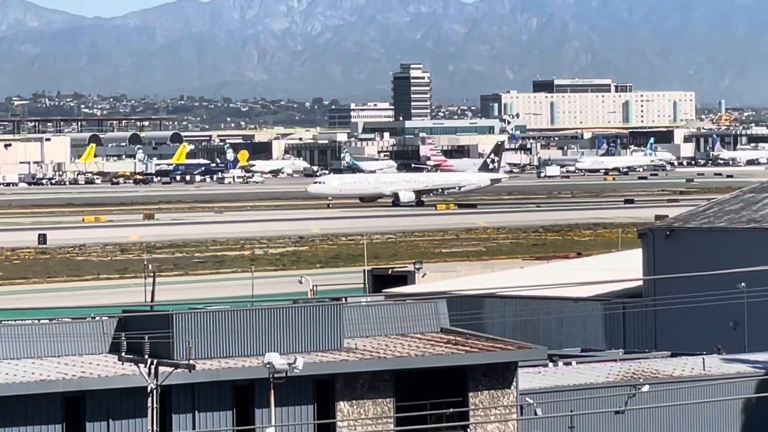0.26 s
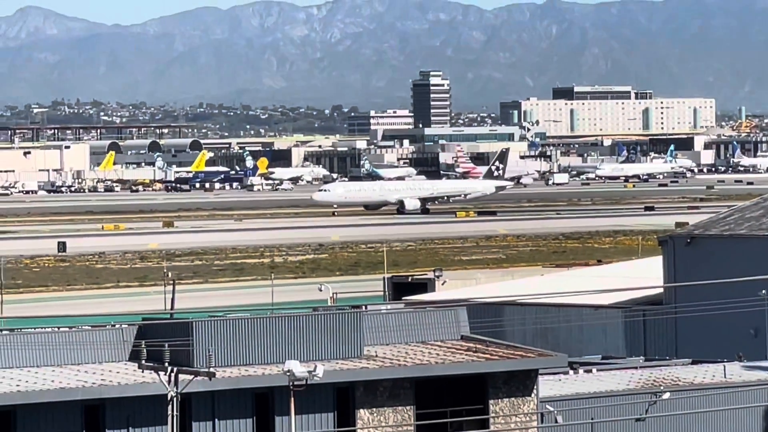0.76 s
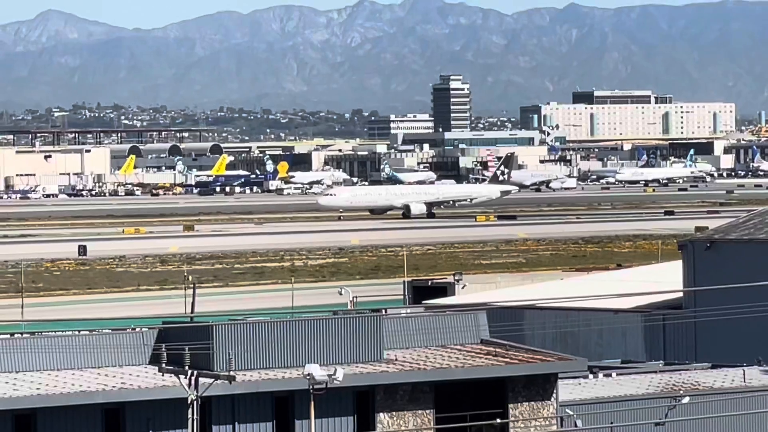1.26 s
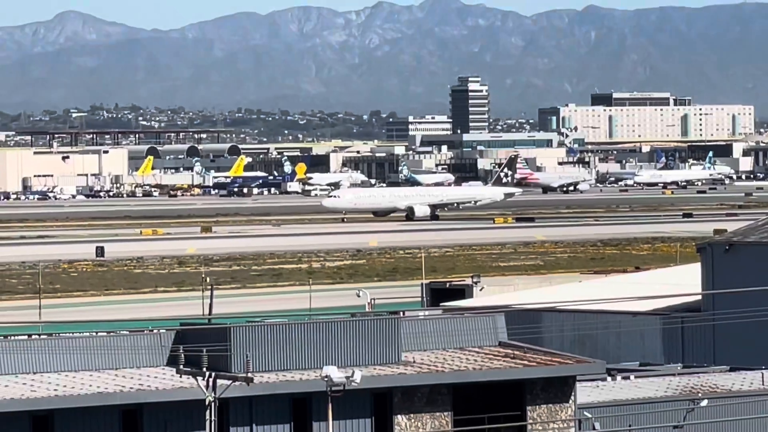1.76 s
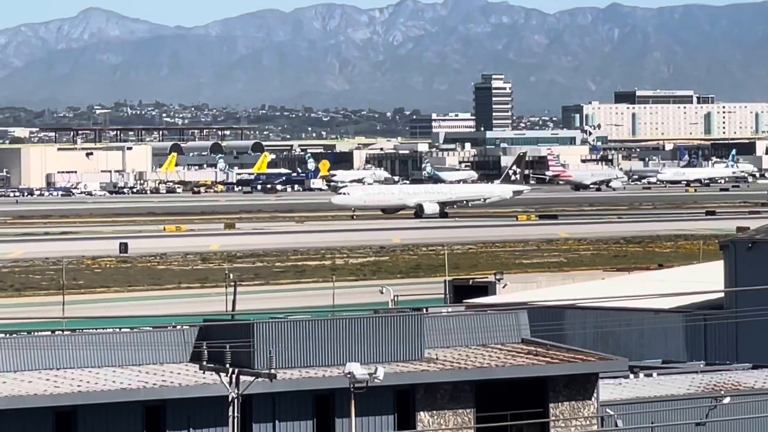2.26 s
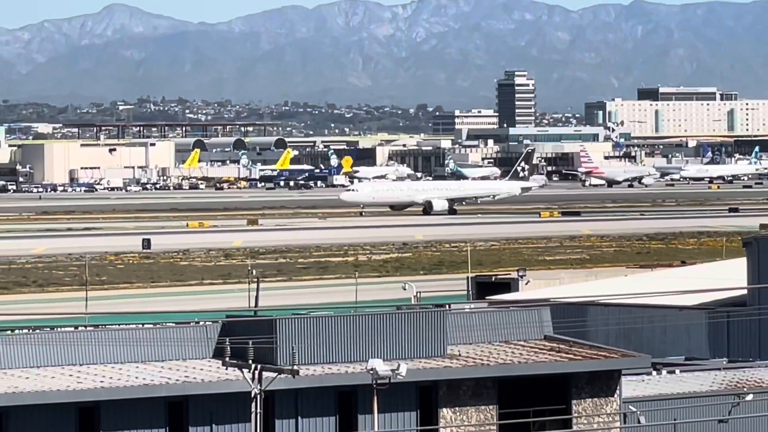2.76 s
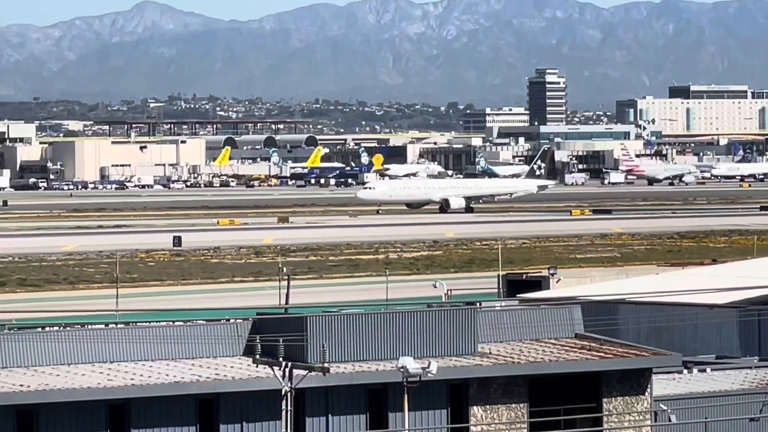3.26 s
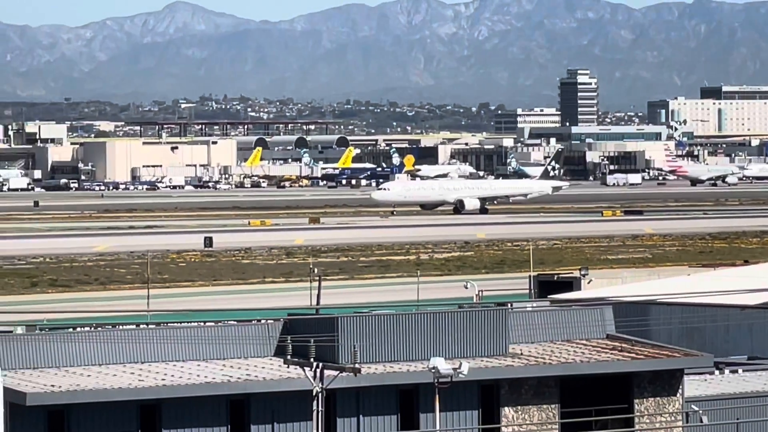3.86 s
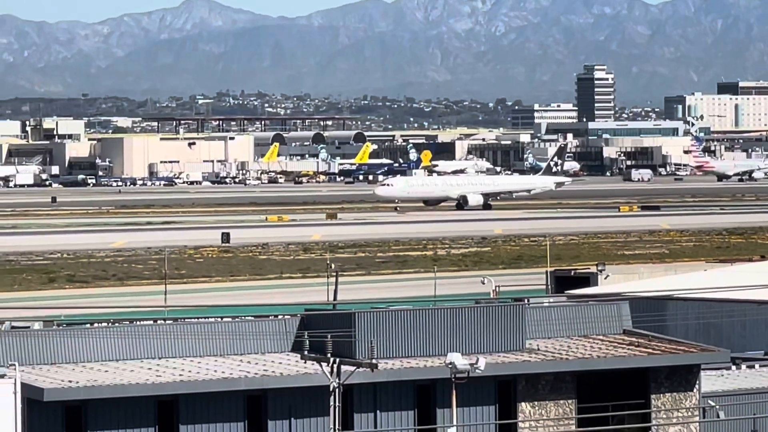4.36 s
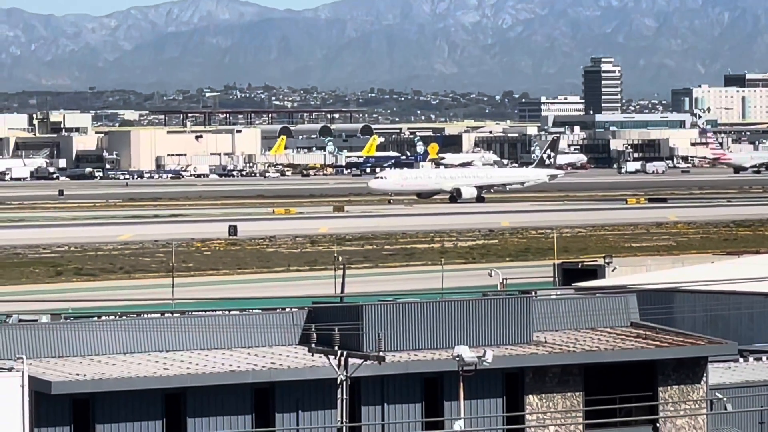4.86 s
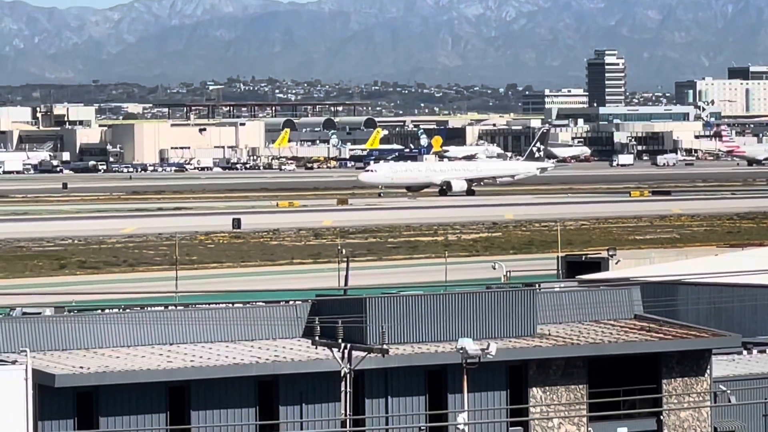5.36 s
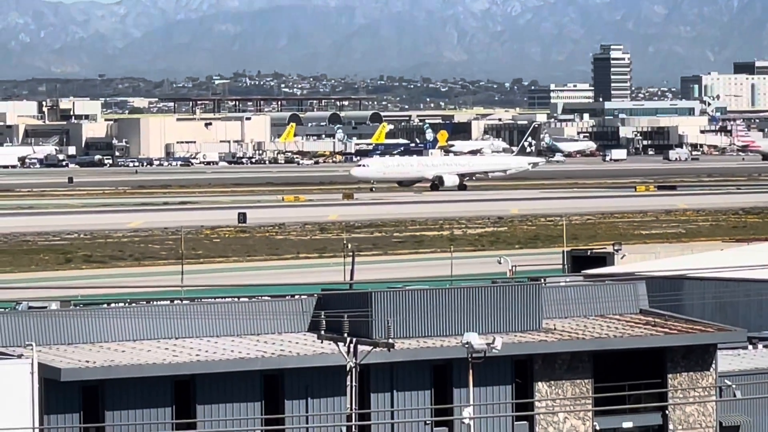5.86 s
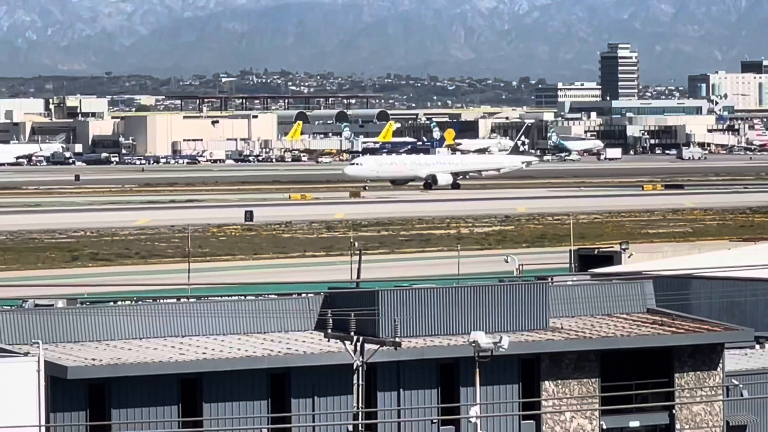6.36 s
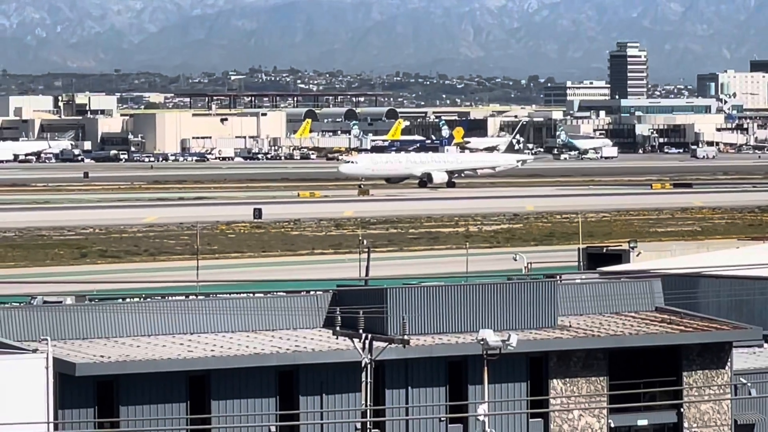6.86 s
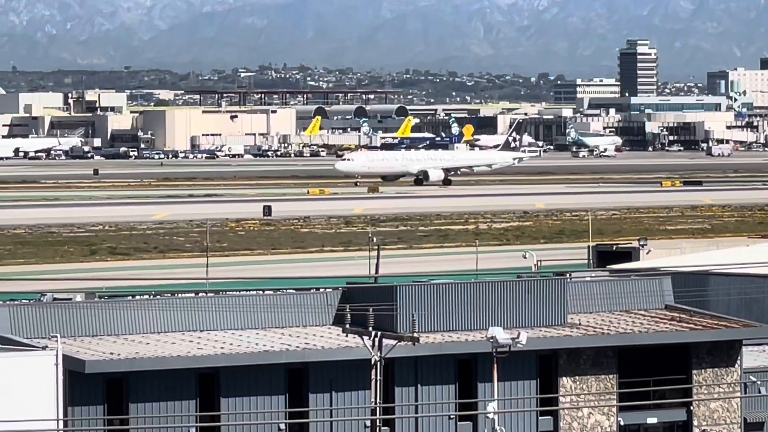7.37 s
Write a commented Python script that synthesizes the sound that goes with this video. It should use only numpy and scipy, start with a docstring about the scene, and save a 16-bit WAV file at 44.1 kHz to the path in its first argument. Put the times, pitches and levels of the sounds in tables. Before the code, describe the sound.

A distant airliner's dull jet roar swells and thins over deep airfield rumble while a nearer engine drone grows louder on the left.

```python
"""A rooftop within earshot of an airfield: on a far runway an airliner rolls down, a dull roar of shaped noise
that swells and thins. A nearer engine drones past on the left, tones on a pitch that sinks overall, with a rush
of noise; wide noise bands make the airfield rumble. Machinery hums in wavering low tones, a light wind puffs,
dull thumps are short bass bursts, and narrow hiss patches and clicks rustle and tick faintly close to the phone."""
import sys
import numpy as np
from scipy import signal
from scipy.fft import rfft, irfft
from scipy.io import wavfile
from scipy.ndimage import uniform_filter1d

SR = 44100
rng = np.random.default_rng(int(sys.argv[2]) if len(sys.argv) > 2 else 0)


def generate_wav(sig):
    """Save sig (samples, or channels by samples) to the path in sys.argv[1] as 16-bit PCM at SR."""
    pcm = np.round(np.clip(np.atleast_2d(sig).T, -1, 1) * 32767).astype(np.int16)
    wavfile.write(sys.argv[1], SR, pcm)


N = 336042  # length [samples]
OCTAVES = np.arange(5, 14.)  # band centres [log2 Hz]
LEFT_RIGHT = np.array([[1], [-1]])  # sign of a left-minus-right offset at each port


def undb(db):
    """Decibels to gain."""
    return 10 ** (np.asarray(db) / 20)


def curves(table):
    """Columns of a table as values per sample."""
    s, *columns = np.transpose(table)
    return [np.interp(np.arange(N) / SR, s, c) for c in columns]


def walk(rate):
    """Random levels held 1 / rate s and slewed twice; spread near 1."""
    hold = int(SR / rate)
    steps = np.repeat(rng.standard_normal(N // hold + 1), hold)
    return 1.3 * uniform_filter1d(uniform_filter1d(steps, hold), hold)[:N]


def bin_hz():
    """Frequencies of the spectrum's bins, one bin up so that none is zero."""
    return np.arange(1, N // 2 + 2) * SR / N


def stereo_noise(colour, likeness, lead, pan_db):
    """Spectra of a coloured noise of rms near 1 at two ports: a shared part and an unrelated part."""
    points, db = np.transpose(colour)
    gain = undb(np.interp(np.log(bin_hz()), np.log(points), db, left=-120, right=-120))
    mid, side = (rfft(rng.standard_normal(N)) for _ in range(2))
    c = np.clip(likeness, 0, 1)
    ports = np.sqrt((1 + c) / 2) * mid + LEFT_RIGHT * np.sqrt((1 - c) / 2) * side
    ports = ports * np.exp(.5j * LEFT_RIGHT * lead)
    return ports * undb(LEFT_RIGHT * pan_db / 2) * gain / np.sqrt(np.mean(gain ** 2))


def turbulent(spectra, band_db, patchy_db, rate, centres):
    """Splits a sound into soft bands (centres in octaves); each has its own level and flickers with the air."""
    octave = np.clip(np.log2(bin_hz()), centres[0], centres[-1])
    spacing = centres[1] - centres[0]
    out = 0
    for centre in centres:
        share = np.cos(np.pi / 2 * np.clip((octave - centre) / spacing, -1, 1)) ** 2
        level_db = band_db(2 ** centre) + patchy_db * walk(rate)
        out = out + irfft(spectra * share, N) * undb(level_db)
    return out


# jet roar as it arrives, swelling with the wind along the path: (time [s], level [dB], hump centre [Hz])
JET = [(0, -34.5, 1180), (.35, -35.5, 1160), (.8, -35, 1060), (1.05, -33, 1030), (1.27, -31, 1015),
       (1.59, -36, 1040), (1.95, -32, 1110), (2.25, -34.5, 1130), (2.5, -35, 1160), (3.18, -35, 1130),
       (3.55, -34, 1180), (3.9, -33, 1170), (4.13, -35, 1110), (4.44, -37, 1160), (4.7, -35, 1120),
       (5.1, -35, 1240), (5.4, -34.5, 1290), (5.75, -37.5, 1160), (6.2, -39.5, 1100), (6.67, -39, 1052),
       (7.1, -41.5, 1003), (7.62, -42.5, 1000)]
# colour after a long path, a ground dip below the hump and air loss above it:
# (frequency [Hz], relative density [dB per Hz])
JET_COLOUR = [(300, -29.5), (600, -9.5), (850, -10.5), (930, -2), (1050, -1), (1250, -2), (1600, -6.5),
              (2000, -13.5), (2500, -19.5), (3000, -31), (3600, -39)]
# eddies on the path shake the whole roar: slow gusts, quick grain
JET_GUST_DB, JET_GRAIN_DB = .45, .6
# swells lift the hump more than the treble: tilt lost [dB per octave] for each dB above the running mean
JET_DULLING, JET_MEAN_S, JET_TILT_DB = 0.72, 3.8, 0.1
# the hump drifts as the path over the ground changes: lift at its centre, width
HUMP_DB, HUMP_OCTAVES = 2, 0.3


def jet():
    """Exhaust turbulence; wind along the long path brightens and dulls it and shifts its hump."""
    db, hump_hz = curves(JET)
    swell_db = db - uniform_filter1d(db, int(JET_MEAN_S * SR))
    tilt_db = JET_TILT_DB - JET_DULLING * swell_db

    def band_db(hz):
        """Tilt around the hump plus the hump itself."""
        octaves_off = np.log2(hz / hump_hz)
        return tilt_db * octaves_off + HUMP_DB * np.exp(-(octaves_off / HUMP_OCTAVES) ** 2)

    gusts_db = JET_GUST_DB * walk(14) + JET_GRAIN_DB * walk(40)
    roar = stereo_noise(JET_COLOUR, likeness=1, lead=0, pan_db=0)
    thirds = np.arange(9, 11.5, 1 / 3)  # third-octave centres
    return undb(db + gusts_db) * turbulent(roar, band_db, patchy_db=1.05, rate=12, centres=thirds)


# firing tone, fading in and out as buildings and echoes come between: (time [s], level [dB])
DRONE = [(1, -45), (1.3, -31.5), (1.5, -27.5), (1.75, -34.5), (2.1, -33.5), (2.4, -42), (3.05, -35),
         (3.3, -41.5), (3.7, -30), (4.15, -30.5), (4.35, -26.5), (4.6, -36), (4.8, -25), (5.1, -31),
         (5.4, -27), (5.8, -26), (6.15, -34), (6.33, -31.5), (6.45, -24), (6.55, -18.5), (6.68, -13.5),
         (6.92, -13.5), (6.99, -16), (7.02, -19), (7.05, -14.5), (7.3, -17.5), (7.48, -18.5), (7.515, -23),
         (7.55, -22), (7.575, -18), (7.62, -17.5)]
# pitch of the passing engine, sinking overall: (time [s], firing rate [Hz], level of upper orders [dB])
DRONE_PITCH = [(1, 93.53, -61), (3.7, 92.8, -52.5), (4.3, 92.1, -46), (5.35, 91.36, -43), (5.8, 90.3, -44),
               (6.3, 89.85, -43.5), (6.65, 86.3, -46.5), (7.0, 87, -40), (7.1, 85.65, -43),
               (7.62, 84.47, -40.5)]
# upper orders, uneven cylinders give the half orders:
# (multiple of the firing rate, far level [dB], near level [dB], left leads [rad])
DRONE_ORDERS = [(1.5, -4.5, -5, .1), (2, -7.5, -9.5, .1), (3, -7, -18, .3), (3.5, -6.5, -9.5, .4),
                (4.5, -8, 0.5, .5), (5, -9.5, -8, .5), (5.5, 1, 1.5, .5), (6, -3.5, 0.5, .5)]
# the drone swings out to the left: (time [s], share of the orders' lead, roughness [1 = far])
DRONE_SWING = [(1, .1, 1), (5.2, .2, 1), (6, .8, 1), (6.3, .9, 1), (6.7, 1, .7), (6.9, 1, .75),
               (6.98, 1, 1.6), (7.06, 1, .7), (7.62, 1.1, .75)]
DRONE_PAN_DB = -1.33  # firing tone only, left minus right


def drone():
    """A fluttering firing tone and broken upper orders, clearer as it nears but for a brief rough spell."""
    hz, upper_db = curves(DRONE_PITCH)
    tone_db, = curves(DRONE)
    swing, rough = curves(DRONE_SWING)
    phase = 2 * np.pi * np.cumsum(hz) / SR
    near = np.clip((1 - rough) / (1 - rough.min()), 0, 1)

    flutter = (1 - near / 2) * rough
    tone_gain = undb(tone_db + 0.64 * flutter * walk(13) + LEFT_RIGHT * DRONE_PAN_DB / 2)
    tone = tone_gain * np.sin(phase + 0.12 * flutter * walk(5.4))

    upper = 0
    for k, far_db, near_db, lead in DRONE_ORDERS:
        broken_db = rough * (3.2 * walk(16) + 1.1 * walk(5))
        order_db = far_db + near * (near_db - far_db) + broken_db
        order_phase = k * (phase + .14 * rough * walk(25))
        upper = upper + undb(order_db) * np.sin(order_phase + LEFT_RIGHT * swing * lead / 2)

    arrival = np.clip((np.arange(N) / SR - DRONE[0][0]) / 0.16, 0, 1)
    return np.sqrt(2) * arrival * (tone + undb(upper_db) * upper)


# broad rush from the left that grows as the engine comes near: (time [s], level [dB])
RUSH = [(0, -48), (1, -43.5), (1.5, -46), (2.2, -52.5), (2.8, -52), (3.4, -49), (4.2, -46), (5.2, -42.5),
        (6.6, -39.5), (7.62, -40.5)]
# colour of the rush: (frequency [Hz], relative density [dB per Hz])
RUSH_COLOUR = [(350, -17), (550, 0.5), (800, 1), (1100, 1.5), (1500, -8.5), (2000, -24), (2700, -32.5)]
RUSH_LIKENESS, RUSH_LEAD_RAD, RUSH_PAN_DB = 0.38, 0.93, 4.5  # left leads and is louder


def rush():
    """A wide noise that follows its own swell."""
    wide = stereo_noise(RUSH_COLOUR, RUSH_LIKENESS, RUSH_LEAD_RAD, RUSH_PAN_DB)
    level = undb(curves(RUSH)[0])
    return level * turbulent(wide, lambda hz: 0, patchy_db=0.2, rate=6.9, centres=OCTAVES[4:7])


# dull low thumps: (time [s], pitch [Hz], peak level [dB])
THUMPS = [(.12, 55, -27), (0.802, 60, -25), (2.79, 55, -26), (3.901, 55, -23), (4.262, 75.4, -22),
          (4.69, 60, -33), (6.97, 60.3, -15.5), (7.429, 62, -27), (7.539, 75.6, -10), (7.61, 65, -21)]
THUMP_S = 0.012  # from the peak to 1/e


def thumps():
    """A cycle or two of deep bass under a soft swell."""
    t = np.arange(N) / SR
    out = np.zeros(N)
    for s, hz, db in THUMPS:
        swell = np.exp(-((t - s) / THUMP_S) ** 2)
        out -= undb(db) * swell * np.cos(2 * np.pi * hz * (t - s))
    return out


# fainter rustles fall at random: middle level, scatter, longest length, lowest pitch, range in octaves
FAINT_DB, FAINT_SCATTER_DB, FAINT_LONGEST_S, FAINT_HZ, FAINT_OCTAVES = -81.5, 3, 0.099, 5100, .48


def faint_rustles(count):
    """Rows like those of the loud rustles, drawn at random."""
    when, length, pitch, size = rng.random((count, 4)).T
    starts = when * (N / SR - FAINT_LONGEST_S)
    lengths = FAINT_LONGEST_S * (1 + 3 * length) / 4
    centres = FAINT_HZ * 2 ** (FAINT_OCTAVES * pitch)
    levels = FAINT_DB + FAINT_SCATTER_DB * (2 * size - 1)
    return list(zip(starts, lengths, centres, levels))


# loudest rustles: (time [s], length [s], centre [Hz], rms level [dB])
RUSTLES = [(1.48, .07, 8000, -85), (1.4, 0.035, 6900, -73), (1.2, .08, 5350, -81), (1.34, .04, 5450, -72),
           (1.475, 0.058, 5200, -68), (1.49, .08, 5550, -68), (1.48, .1, 6900, -72), (1.5, .08, 6300, -79),
           (1.595, 0.03, 6300, -65), (1.8, .04, 6950, -74), (1.5, .06, 6300, -78), (1.6, 0.072, 5250, -73),
           (1.726, .025, 5350, -73), (2.686, .17, 7200, -76), (3.509, .05, 6700, -73),
           (3.8, .05, 6400, -73), (4.167, .03, 12200, -79), (4.167, .04, 14300, -77.5),
           (5.549, 0.15, 6340, -77), (5.5, .14, 5400, -73), (6.585, .08, 5700, -76),
           (6.77, .08, 6600, -78.5), (6.726, 0.043, 5450, -73.5), (6.79, 0.1, 12600, -78.5),
           (6.78, .12, 5400, -75), (6.92, 0.1, 5450, -72.5), (7.17, 0.17, 5500, -78),
           (7.165, .03, 5410, -77), (7.2, .13, 5480, -73), (7.02, .15, 5500, -79.5),
           (7.345, 0.075, 5550, -75)]
# higher rustles are wider: width at 5 kHz, power of its growth with pitch
RUSTLE_WIDTH_HZ, RUSTLE_WIDENING = 270, 2.1


def rustles():
    """Short grainy patches of narrow hiss, only partly alike at the two ports."""
    out = np.zeros((2, N))
    grain = rng.standard_normal((3, N)) * undb(1.6 * walk(120) + 1.1 * walk(50))
    grain = grain[:2] * 0.52 + grain[2] * 0.77  # own part of each port, shared part
    for s, length, hz, db in RUSTLES + faint_rustles(count=24):
        start, n = int(s * SR), int(length * SR)
        width_hz = RUSTLE_WIDTH_HZ * (hz / 5000) ** RUSTLE_WIDENING
        edges_hz = [hz - width_hz / 2, hz + width_hz / 2]
        band = signal.butter(2, edges_hz, "band", fs=SR, output="sos")
        envelope = signal.windows.tukey(n, .45) * np.linspace(1.2, .75, n)
        patch = signal.sosfilt(band, grain[:, start:start + n]) * envelope
        # narrower bands pass less noise, so they are raised
        out[:, start:start + n] += patch * undb(db) * np.sqrt(SR / 2 / width_hz)
    return out


# small dry ticks near the phone: (time [s], peak level [dB], lowest frequency [Hz])
TICKS = [(.328, -62, 6300), (1.217, -68, 9500), (2.601, -68, 9000), (2.674, -70, 10000), (2.782, -65, 9000),
         (2.855, -66, 11000), (2.957, -68, 8500), (3.35, -70, 11000), (4.169, -64, 11000),
         (6.826, -65, 11000)]
TICK_TOP_HZ = 14500


def ticks():
    """Single clicks with only their top left."""
    out = np.zeros(N)
    for s, db, hz in TICKS:
        band = signal.butter(3, [hz, TICK_TOP_HZ], "band", fs=SR, output="sos")
        click = signal.sosfilt(band, signal.unit_impulse(64))
        start = int(s * SR)
        out[start:start + 64] += undb(db) * click / np.abs(click).max()
    return out


# machinery: (frequency [Hz], rms level at the start [dB], waver [dB], rise [dB per s])
HUMS = [(44.8, -37, 1.4, 0), (59.35, -45, 4, 0.7), (152.7, -50, 3, 0)]


def hums():
    """Steady low tones that waver a little."""
    t = np.arange(N) / SR
    out = np.zeros(N)
    for hz, db, waver_db, rise_db in HUMS:
        level = undb(db + waver_db * walk(3) + rise_db * t)
        out += np.sqrt(2) * level * np.sin(2 * np.pi * hz * t + 0.27 * walk(2))
    return out


# colour of the airfield rumble: (frequency [Hz], relative density [dB per Hz])
RUMBLE_COLOUR = [(22, -26.5), (32, -11), (44, 0), (62, 3), (110, 3), (180, -3), (230, 0), (310, -5),
                 (470, -2), (610, -10.5), (900, -8), (1500, -27.5), (3000, -30.5), (5000, -46.5),
                 (7000, -54.5), (8300, -66)]
# how the two ports hear it: (frequency [Hz], likeness [0-1], left leads [rad], left minus right [dB])
RUMBLE_PORTS = [(40, 0.98, 0, -0.5), (100, 1, 0.085, -1), (160, 0.92, -0.25, -1.3), (220, 0.84, 0.17, 0),
                (310, 0.99, 0.37, -0.5), (480, 0.97, 0.28, 0.5), (750, 0.9, 0.55, 1.4),
                (1200, 0.91, .1, -1.5), (2200, 1, 0, 1.2), (3000, .95, .45, 0), (4600, .92, 0.43, 0),
                (5800, 0.3, -0.56, 0)]
# extra bass below the rumble's knee: (time [s], level [dB per octave])
BASS_LEVEL = [(0, 1.5), (1, 1), (1.4, 3), (2.6, 1.5), (3.2, -2.5), (3.7, 5), (5.3, -0.5), (6, 5), (6.8, 3),
              (7.62, 1)]
# treble above the treble knee: (time [s], level [dB])
RUMBLE_TREBLE = [(0, -1.5), (.5, -1), (1, 0), (1.6, 0), (2.2, 1), (2.7, 2.5), (3.1, 0), (3.7, 2.5),
                 (4.3, 0), (5, 1.5), (5.7, 1.5), (6.5, .5), (7.62, -0.9)]
RUMBLE_KNEE_HZ, TREBLE_KNEE_HZ = 130, 3000
RUMBLE_DB, RUMBLE_WANDER_DB = -31, 0.9  # steady level; wander of the bass [dB per octave below the knee]


def rumble():
    """Many far engines and the city, arriving from all sides."""
    bass_db = curves(BASS_LEVEL)[0] + RUMBLE_WANDER_DB * walk(3)
    treble_db, = curves(RUMBLE_TREBLE)

    def band_db(hz):
        """Bass grows with each octave below its knee; treble is one shelf."""
        return bass_db * max(np.log2(RUMBLE_KNEE_HZ / hz), 0) + treble_db * (hz > TREBLE_KNEE_HZ)

    hz, *ports = np.transpose(RUMBLE_PORTS)
    likeness, lead, pan_db = (np.interp(np.log(bin_hz()), np.log(hz), p) for p in ports)
    wide = stereo_noise(RUMBLE_COLOUR, likeness, lead, pan_db)
    return undb(RUMBLE_DB) * turbulent(wide, band_db, patchy_db=0.5, rate=4, centres=OCTAVES)


# light wind on the ports: (frequency [Hz], relative density [dB per Hz])
WIND_COLOUR = [(25, -9), (45, -1), (80, 4.5), (130, -10.5)]
WIND_DB = -48


def wind():
    """Low puffs, unrelated at the two ports."""
    puffs = undb(WIND_DB + 3.2 * walk(18))
    return puffs * irfft(stereo_noise(WIND_COLOUR, likeness=0, lead=0, pan_db=0), N)


# faint airy hiss at the very top: (frequency [Hz], relative density [dB per Hz])
AIR_COLOUR = [(9800, -12), (10600, -3.5), (12000, 1.5), (13600, -1), (14300, -9)]
AIR_DB = -91


def air():
    """A thin high hiss that flickers, partly alike at the two ports."""
    flicker = undb(AIR_DB + 2.5 * walk(4.9) + 1.5 * walk(30))
    return flicker * irfft(stereo_noise(AIR_COLOUR, likeness=0.49, lead=0, pan_db=0), N)


def scene():
    """All sources as they reach the two ports."""
    near_phone = thumps() + rustles() + ticks()
    background = hums() + rumble() + wind() + air()
    return jet() + drone() + rush() + near_phone + background


LOW_CUT_HZ, TOP_HZ, HISS_DB = 27.5, 15900, -106
# the converter mirrors a trace of the sound, mostly its bass, to both sides of this pitch
IMAGE_HZ, IMAGE_DB = 12000, -68


def record(dry):
    """The phone thins the deepest bass, adds a trace of hiss, cuts the top and opens in a few milliseconds."""
    lead_in = 2000  # samples of turned-over sound that let the filters settle
    running = np.concatenate([2 * dry[:, :1] - dry[:, lead_in:0:-1], dry], axis=1)
    thin = signal.sosfilt(signal.butter(2, LOW_CUT_HZ, "high", fs=SR, output="sos"), running)
    t = np.arange(N + lead_in) / SR
    image = undb(IMAGE_DB) * thin * np.cos(2 * np.pi * IMAGE_HZ * t)
    hiss = undb(HISS_DB) * rng.standard_normal(N + lead_in)
    top_cut = signal.ellip(8, .2, 70, TOP_HZ, fs=SR, output="sos")
    heard = signal.sosfilt(top_cut, thin + image + hiss)[:, lead_in:]
    return heard * np.minimum(np.arange(N) / 200, 1)


dry = scene()
out = record(dry)
generate_wav(out)
```